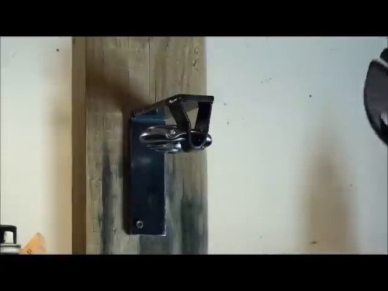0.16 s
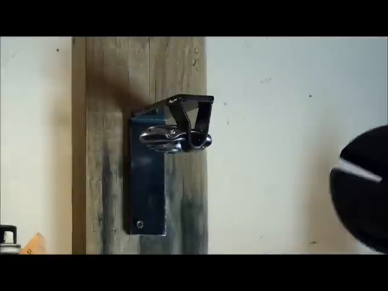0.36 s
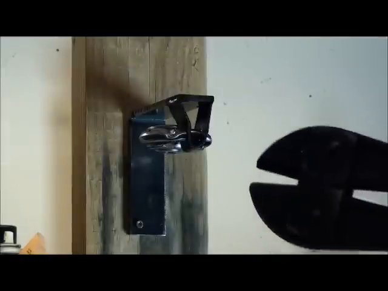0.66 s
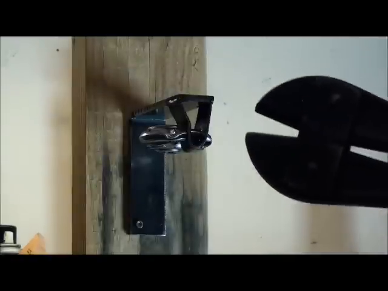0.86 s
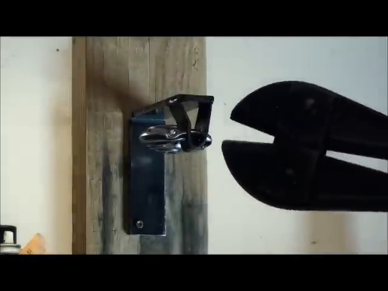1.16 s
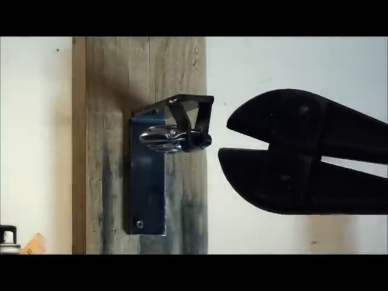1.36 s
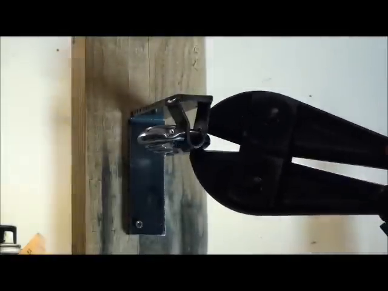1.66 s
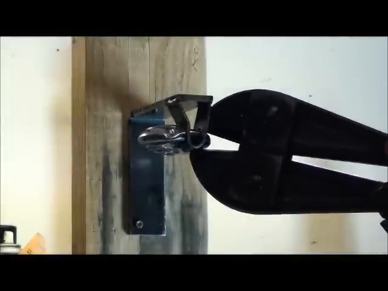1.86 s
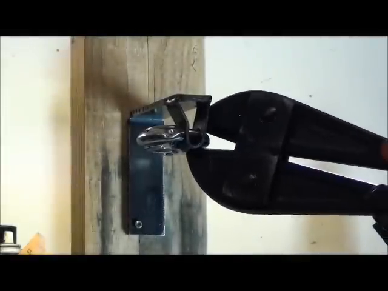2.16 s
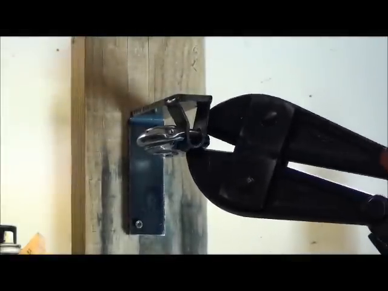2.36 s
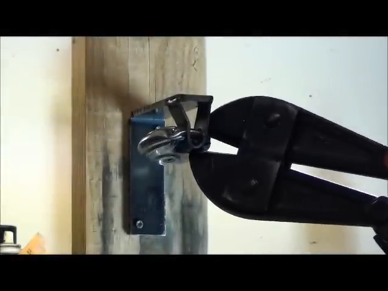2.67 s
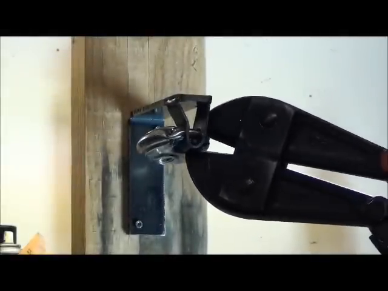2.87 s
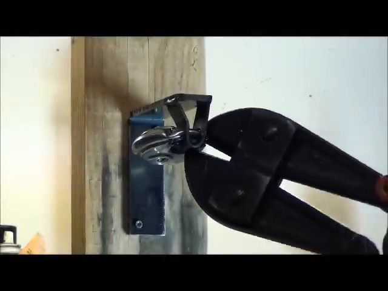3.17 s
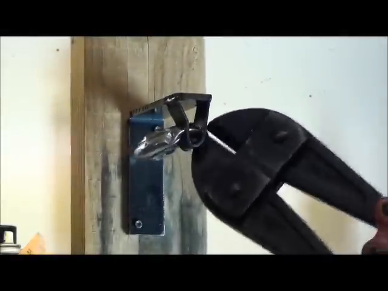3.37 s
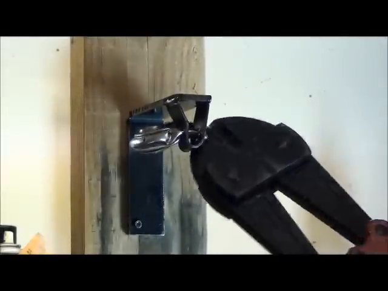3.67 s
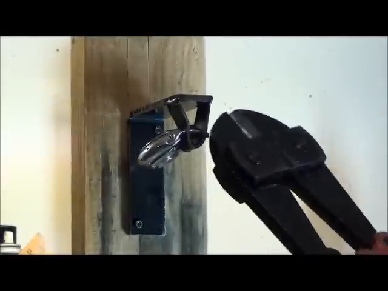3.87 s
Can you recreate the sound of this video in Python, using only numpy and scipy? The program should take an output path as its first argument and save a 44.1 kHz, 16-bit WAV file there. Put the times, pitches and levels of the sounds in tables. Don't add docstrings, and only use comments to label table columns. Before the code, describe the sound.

Close stereo microphone in a quiet, reverberant workshop: a fading earlier knock and soft rustling, a near-silent pause, then bolt cutters clunk against a padlock in irregular clusters, wood thudding and steel ticking, loudest last.

```python
import sys
import numpy as np
from scipy import signal
from scipy.fft import rfft, irfft
from scipy.io import wavfile

SR = 44100
rng = np.random.default_rng(int(sys.argv[2]) if len(sys.argv) > 2 else 0)


def boost(x):
    u = np.asarray(x, float) / 20
    return 10 ** u


def generate_wav(sig):
    pcm = np.round(np.clip(np.atleast_2d(sig).T, -1, 1) * 32767).astype(np.int16)
    wavfile.write(sys.argv[1], SR, pcm)


N = 176400

# (frequency [Hz], side minus mid [dB])
FLOOR_COLOUR = [(15, -37), (30, -14.5), (96, -6.5), (228, -11.5), (261, -3), (413, -17), (460, -14.5),
                (2580, -26), (15700, -32)]
FLOOR_SPREAD = [(60, -9.5), (240, -3), (950, 6), (3770, -1.5), (15000, -10.5)]
# (frequency [Hz], t60 [s])
ROOM_DECAY = [(60, 0.77), (160, 0.86), (420, 0.52), (1100, 0.55), (2900, 0.54), (7700, 0.45), (14000, 0.2)]
# (frequency [Hz], level [dB])
ROOM_TONE = [(60, -3.5), (250, 2), (1000, 3), (3000, 4), (8000, -0.5), (14000, 5)]
# (frequency [Hz], side minus mid [dB])
ROOM_SPREAD = [(60, -23), (250, -20.5), (700, -11), (2000, -8.5), (5000, -6), (9000, -7), (13000, -24)]
# (frequency [Hz], level [dB])
EARLIER_KNOCK_COLOUR = [(150, -20), (300, -19.5), (2000, -11.0), (4000, -36)]
# (centre time [s], half length [s], level [dB], centre frequency [Hz], width [octaves])
CLOTH_STROKES = [(0.11, 0.017, -57.5, 9000, 0.33), (0.096, 0.012, -60, 1800, 1),
                 (0.23, 0.035, -54.5, 8700, 0.46), (.27, 0.097, -58, 1240, 2.3),
                 (0.61, 0.043, -60, 407, 0.18), (0.37, 0.059, -50, 7600, 0.41),
                 (0.38, 0.034, -46.5, 2060, 1.46), (0.68, .04, -67, 2700, 1.9),
                 (1.25, 0.078, -64.5, 3400, 1.9), (2.55, 0.47, -59, 36, 0.38),
                 (3.334, 0.21, -57, 5700, 1.1), (3.3, 0.069, -55.5, 2300, 0.46),
                 (3.835, 0.046, -54, 2400, 2), (0.272, 0.018, -58, 1020, .04),
                 (0.266, 0.018, -59, 2090, 0.049), (0.262, 0.012, -60, 3290, .03),
                 (0.22, 0.057, -61, 6800, .02), (0.396, .025, -55, 2070, 0.059),
                 (0.363, 0.019, -60, 3100, 0.22), (0.17, 0.048, -58.5, 324, 0.072),
                 (0.16, 0.055, -63, 1780, .03)]
# (time [s], level [dB])
BENCH_PUSHES = [(1.673, -49), (1.738, -37), (1.775, -34), (1.828, -42), (2.223, -45), (2.255, -31.5),
                (2.646, -46), (2.784, -38.5), (2.849, -36), (2.915, -21), (3.206, -34.5), (3.437, -34),
                (3.47, -20), (3.548, -24), (3.882, -27)]
# (frequency [Hz], level [dB], t60 [s])
BENCH_MODES = [(61, -13, 0.34), (99, -8, 0.12), (122, 0.5, 0.17), (170, -10, 0.095)]
# (time [s], peak level [dB], brightness [dB per octave])
STEEL_TICKS = [(1.679, -18.5, -3.5), (1.689, -26, -2), (1.706, -35, 9), (1.712, -23.5, -3.5),
               (1.819, -27.5, -7.5), (2.128, -39, -5.5), (2.153, -34, -4.5), (2.224, -40.5, 2),
               (2.271, -23, -7), (2.552, -35, -6), (2.713, -42, 3), (2.766, -38.5, -7.5), (2.842, -33, -1),
               (2.849, -23.5, 2.5), (2.918, -25, -5), (3.101, -43, 11), (3.221, -48.5, -14),
               (3.264, -37.5, 7), (3.443, -20.5, -2.5), (3.451, -23, -3), (3.457, -17.5, -5),
               (3.468, -19.5, 22), (3.484, -17, 13), (3.489, -8.5, 5.5), (3.502, -23, 15),
               (3.509, -19.5, 19), (3.523, -25, -14), (3.852, -25, -4), (3.855, -15, 0), (3.864, -15, -5.5)]
# (frequency [Hz], level [dB])
STEEL_COLOUR = [(700, -35), (3000, -18), (4400, -2), (5500, -1), (7500, 4), (9500, -0.5), (11500, -13),
                (15500, -42)]
# (time [s], level [dB], brightness [dB per octave])
HASP_CLANKS = [(1.681, -25.5, -4), (1.706, -25, 12), (1.774, -29.5, -9), (1.82, -23, -1), (2.127, -39, 1),
               (2.154, -38.5, -9), (2.226, -33.5, -2), (2.273, -21, -7), (2.55, -43, 0), (2.767, -31, -7),
               (2.777, -41, -9), (2.847, -25.5, -1.5), (2.918, -27.5, -1), (3.115, -37.5, -4),
               (3.225, -42, -3), (3.263, -37.5, 1), (3.443, -23.5, 3), (3.483, -20, 2), (3.526, -24.5, 1),
               (3.638, -37.5, -19), (3.811, -38.5, -9), (3.837, -34, -14), (3.855, -24, 6),
               (3.867, -19, -4.5)]
# (frequency [Hz], level [dB], t60 [s])
HASP_MODES = [(1386, -2.5, 0.018), (1720, -6.5, 0.0089), (1793, 0, 0.024), (1954, -1, 0.0093),
              (2064, 1.5, 0.01), (2207, -3, 0.017), (2410, -6.5, 0.02), (2700, -19.5, 0.01),
              (2718, -1.5, 0.013), (2890, -7.5, 0.015), (3050, -1.5, 0.009), (3440, 1.5, 0.0044),
              (3810, -8, 0.0078)]
# (time [s], peak level [dB], chatter [ms], brightness [dB per octave],
# pitch favoured by the spot struck [Hz])
PLANK_THUDS = [(1.683, -23, 14.1, -2, 425), (1.704, -16.5, 16.4, -3.5, 336), (1.71, -25.5, 16, 9.5, 810),
               (1.775, -10.5, 13, -2, 850), (1.779, -16, 9.5, 5, 1040), (1.82, -12, 11.9, -1, 444),
               (1.825, -19, 9, 0.5, 1070), (1.864, -35.5, 22, 0, 725), (1.895, -30, 12.8, 2, 440),
               (2.129, -28, 19.8, 0.5, 1080), (2.157, -32.5, 14.7, -6, 517), (2.227, -14, 26, -0.5, 1070),
               (2.275, -15.5, 10, 0, 440), (2.279, -14.5, 9.6, 1, 1070), (2.75, -29, 23, -7, 383),
               (2.78, -25, 20, 2, 930), (2.815, -31, 14.3, -2.5, 890), (2.843, -14.5, 22, 1, 705),
               (2.903, -15, 14, -3.5, 440), (2.922, -24, 12.4, 12, 1050), (2.944, -32, 9.2, 0, 440),
               (3.009, -28.5, 10, -3, 340), (3.211, -23.5, 22.8, -4.5, 296), (3.257, -26, 33, 8.5, 980),
               (3.38, -28.5, 23, -5, 294), (3.442, -11.5, 10.1, -2, 676), (3.47, -14.5, 13, 5, 660),
               (3.482, -14, 9.75, -3, 422), (3.49, -12, 18.2, 6.5, 1070), (3.53, -18, 17, -4.5, 432),
               (3.58, -17.5, 12.1, -5, 440), (3.638, -17, 6.9, 4.5, 1015), (3.809, -22.5, 22, -2.5, 440),
               (3.834, -23, 14, 10, 770), (3.849, -13, 14.4, 0.5, 442), (3.865, -7, 8.35, 0.5, 465),
               (3.891, -14.5, 11.4, 7.5, 836), (3.938, -27, 10.2, -4, 810)]
# (frequency [Hz], level [dB], t60 [s])
PLANK_MODES = [(264, -12.5, 0.038), (287, -4.5, 0.048), (324.4, -6, 0.069), (442.5, -2, 0.078),
               (508, -2.5, 0.041), (552, -6.5, 0.092), (673, -2, 0.05), (730, -3, 0.072),
               (781, -1.5, 0.063), (850, -3, 0.036), (917, -3, 0.045), (1021, -9, 0.014),
               (1070, 0.5, 0.033), (1215, -6, 0.036)]
# (time [s], level [dB])
SHACKLE_SQUEAKS = [
    (2.749, -46),
    (3.2195, -35),
    (3.228, -35.5),
    (3.265, -41),
    (3.29, -47),
]
# (frequency [Hz], level [dB], t60 [s])
SHACKLE_MODES = [(2180, -3, 0.027), (2800, 1.5, 0.024), (3320, -5, 0.026), (4340, -15, .02),
                 (5130, -7.5, 0.017)]

FLOOR_DB, ROOM_DB, EARLIER_KNOCK_DB = -54, -4, -4
ROOM_BUILD_S, ROOM_SHIFT_S = 0.0037, 0.009
RUMBLE_DB, TICK_DB, CRACK_DB, CLANK_DB, THUD_DB = -7, -19.5, -10, -8, -13.5
TICK_CHATTER_S, STEEL_T60_S = 0.007, 0.006
SPOT_DB, SPOT_OCTAVES, UNEVEN_DB = 7.5, 0.063, 2.5
GRAINS_PER_S, GRAIN_DB = 6000, 3.0
LEAN_DB = -0.38
TOP_HZ = 15880


def rms_one(x):
    return x / np.sqrt(np.mean(x ** 2) + 1e-20)


def at_hz(points, hz):
    table = np.array(points)
    return np.interp(np.log(hz + 1), np.log(table[:, 0]), table[:, 1])


def colour(x, points):
    gain = boost(at_hz(points, np.fft.rfftfreq(x.shape[-1], 1 / SR)))
    return irfft(rfft(x) * gain, x.shape[-1])


def band_pass(x, low, high):
    return signal.sosfilt(signal.butter(2, [low, high], "band", fs=SR, output="sos"), x)


def widen(pair, spread):
    side = colour(pair[1], spread)
    return np.array([pair[0] + side, pair[0] - side])


def strike(times, levels_db, tilts_db, chatter_s, lead_db, modes, count, spots_hz=1):
    order = np.arange(count)
    early = rng.random((len(times), count)) * (order > 0)
    when = (order - early) / (count - 1)
    at = ((times[:, None] + when * chatter_s) * SR).astype(int)
    touch_db = levels_db[:, None] + lead_db * (1 - 2 * when).clip(0) - 6 * when
    chance = rng.standard_normal((len(times), count, len(modes), 2))
    uneven_db, sign = UNEVEN_DB * chance[..., 0], np.sign(chance[..., 1])
    middle = np.mean(np.log2(np.array(modes)[:, 0]))
    rings, hits = np.zeros(N + 4000), np.zeros(N + 4000)
    np.add.at(hits, at, boost(touch_db) * sign[..., 0])
    for k, (hz, db, t60) in enumerate(modes):
        clicks = np.full(len(rings), 1e-18)
        spot_db = SPOT_DB * np.exp(-(np.log2(hz / spots_hz) / SPOT_OCTAVES) ** 2 / 2)
        tilt_db = tilts_db[:, None] * (np.log2(hz) - middle)
        mode_db = db + spot_db + tilt_db + uneven_db[..., k]
        np.add.at(clicks, at, boost(touch_db + mode_db) * sign[..., k])
        r, w = boost(-60 / (t60 * SR)), 2 * np.pi * hz / SR
        rings += signal.lfilter([0, np.sin(w)], [1, -2 * r * np.cos(w), r * r], clicks)
    return rings[:N], hits[:N]


def room_floor():
    hush = colour(rng.standard_normal((2, N)), FLOOR_COLOUR)
    return boost(FLOOR_DB) * rms_one(widen(hush, FLOOR_SPREAD))


def room_answers():
    t = np.arange(SR // 2 + 8000) / SR
    edges = 30 * 2 ** np.arange(0, 9.6, .5)
    white = rng.standard_normal((2, 4, 2, len(t)))
    tails = 0
    for k, (low, high) in enumerate(zip(edges, edges[1:])):
        hz = np.sqrt(low * high)
        fade_db = at_hz(ROOM_TONE, hz) - 60 * t / at_hz(ROOM_DECAY, hz)
        tails = tails + band_pass(white[k % 2], low, high) * boost(fade_db)
    build = (1 - np.exp(-t / ROOM_BUILD_S)) / np.sqrt(0.023 * SR)
    return [widen(pair * build, ROOM_SPREAD) for pair in tails]


def earlier_knock(answer):
    return boost(EARLIER_KNOCK_DB) * colour(answer, EARLIER_KNOCK_COLOUR)[:, 2000:]


def cloth():
    t = np.arange(N) / SR
    octave = np.log2(np.fft.rfftfreq(N, 1 / SR) + 1)
    size = boost(GRAIN_DB * rng.exponential(1, (3, N)).clip(0, 4))
    present = rng.random((3, N)) < GRAINS_PER_S / SR
    grains = rfft(present * rng.standard_normal((3, N)) * size)
    out = np.zeros(N)
    for k, (s, half, db, hz, width) in enumerate(CLOTH_STROKES):
        response = 1 / (1 + ((octave - np.log2(hz)) / width) ** 4)
        band = rms_one(irfft(grains[k % 3] * response, N))
        out += boost(db) * band * np.exp(-((t - s) / half) ** 2 / 2)
    return out


def bench():
    s, db = np.transpose(BENCH_PUSHES)
    pushes = strike(s, db + RUMBLE_DB, 0 * s, 0.0313, -7.5, BENCH_MODES, count=4)[0]
    return band_pass(pushes, 60, 260)


def lock_and_jaws():
    s, db, tilt_db = np.transpose(STEEL_TICKS)
    pitches = np.linspace(3800, 15500, 56) + rng.uniform(-90, 90, 56)
    crowd = [(hz, at_hz(STEEL_COLOUR, hz), STEEL_T60_S) for hz in pitches]
    ticks, hits = strike(s, db + TICK_DB, tilt_db, TICK_CHATTER_S, -0.49, crowd, count=10)
    return ticks + boost(CRACK_DB) * colour(hits, STEEL_COLOUR)


def hasp():
    s, db, tilt_db = np.transpose(HASP_CLANKS)
    return strike(s, db + CLANK_DB, tilt_db, TICK_CHATTER_S * 1.7, -7.0, HASP_MODES, count=12)[0]


def plank():
    s, db, chatter_ms, tilt_db, spot_hz = np.transpose(PLANK_THUDS)
    chatter_s = chatter_ms[:, None] / 1000
    return strike(s, db + THUD_DB, tilt_db, chatter_s, -10.0, PLANK_MODES, count=8,
                  spots_hz=spot_hz[:, None])[0]


def shackle():
    s, db = np.transpose(SHACKLE_SQUEAKS)
    return strike(s, db - 5.5, 0 * s, .008, 0, SHACKLE_MODES, count=4)[0]


def in_room(dry, answers):
    turn = np.arange(N) / SR / ROOM_SHIFT_S
    wet = np.zeros((2, N))
    for k, answer in enumerate(answers):
        share = np.cos(np.pi / 2 * np.abs((turn - k) % 4 - 2).clip(0, 1))
        wet += signal.fftconvolve((dry * share)[None], answer, axes=1)[:, :N]
    return boost(ROOM_DB) * wet


def scene():
    answers = room_answers()
    dry = cloth() + bench() + lock_and_jaws() + hasp() + plank() + shackle()
    wet = in_room(dry, answers)
    tail = earlier_knock(answers[0])
    wet[:, :tail.shape[1]] += tail
    lean = boost(np.array([[LEAN_DB], [-LEAN_DB]]))
    return (dry + wet) * lean + room_floor()


def top_cut(x):
    return signal.sosfilt(signal.butter(12, 15880, fs=SR, output="sos"), x)


def record(dry):
    soft = 1.3 * np.tanh(dry / 1.3)
    passed = np.fft.rfftfreq(N, 1 / SR) < TOP_HZ
    mix = irfft(rfft(soft) * passed, N)
    return top_cut(mix)


dry = scene()
out = record(dry)
generate_wav(out)
```